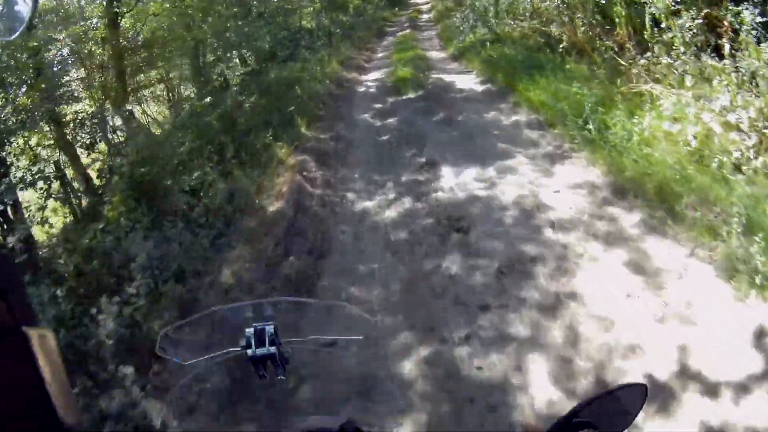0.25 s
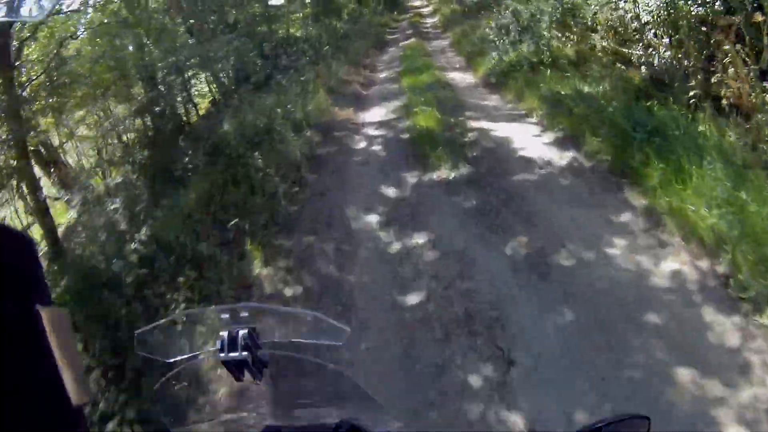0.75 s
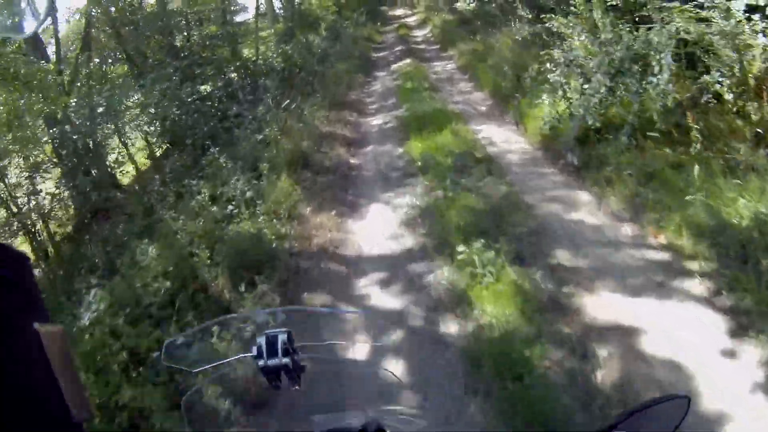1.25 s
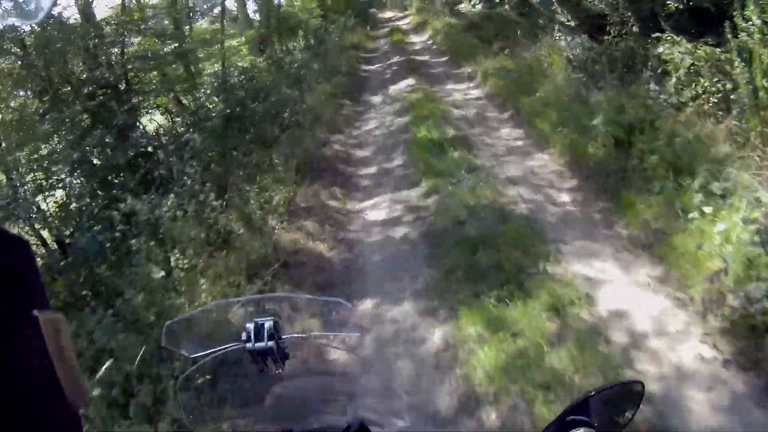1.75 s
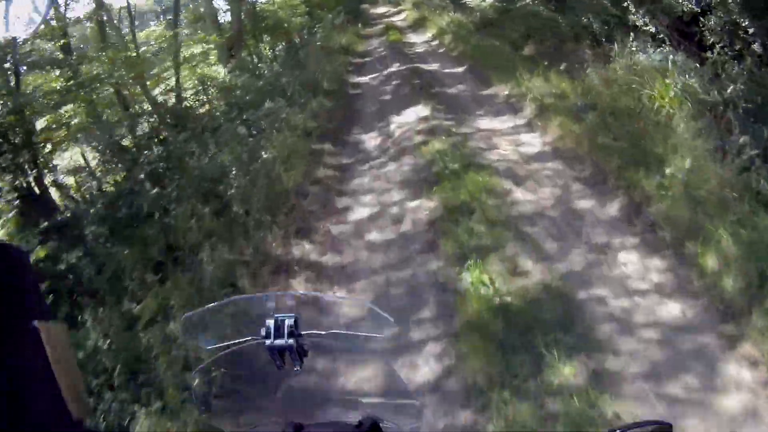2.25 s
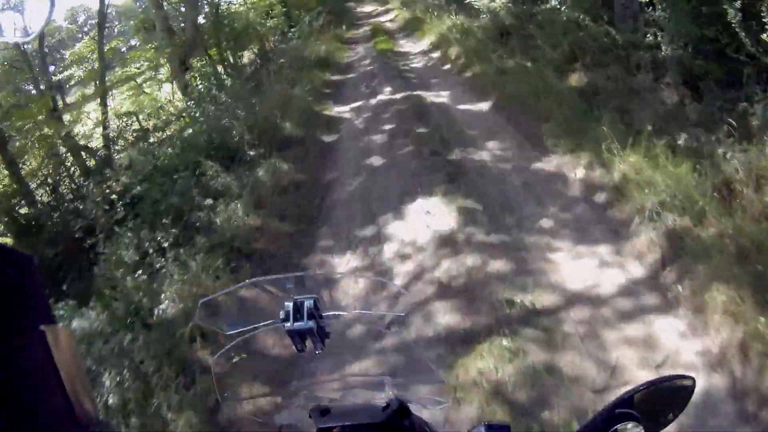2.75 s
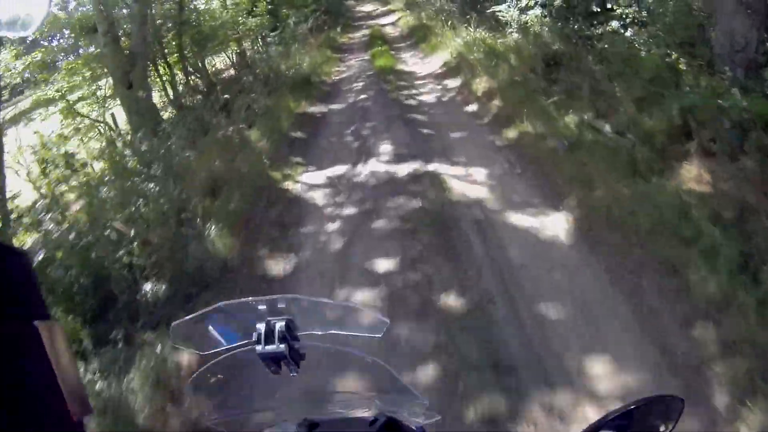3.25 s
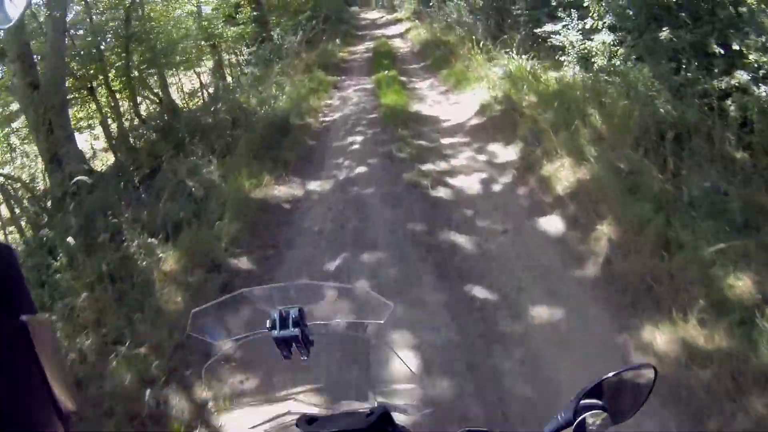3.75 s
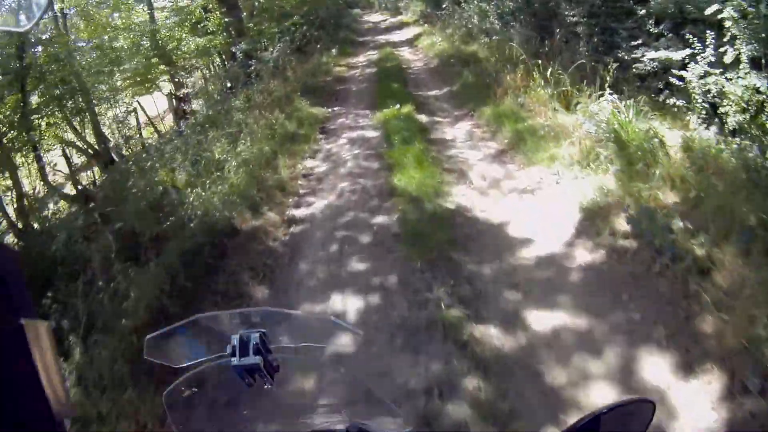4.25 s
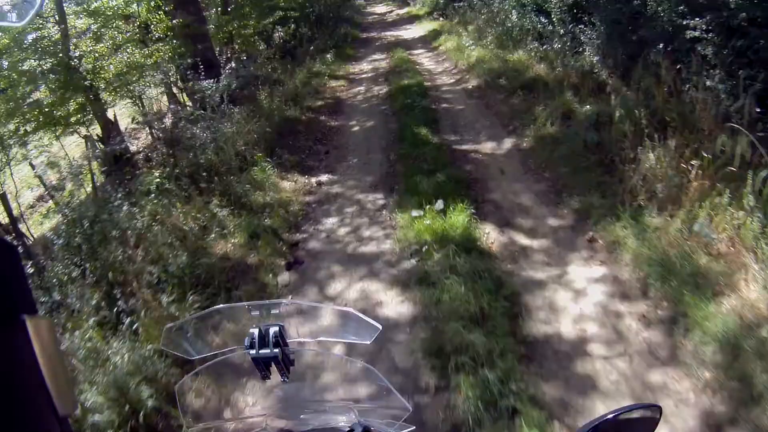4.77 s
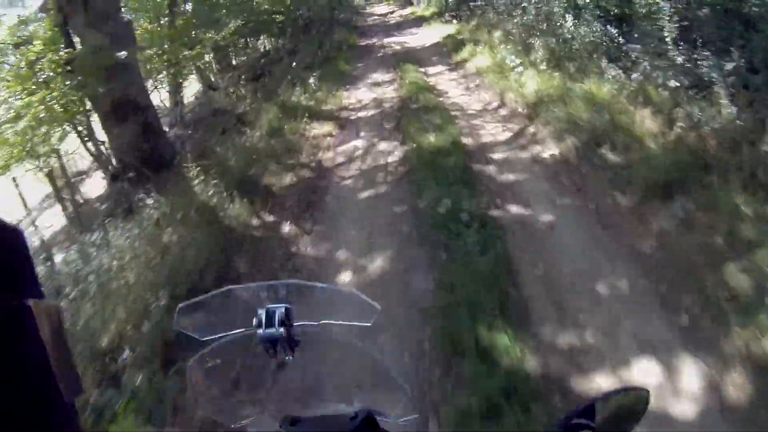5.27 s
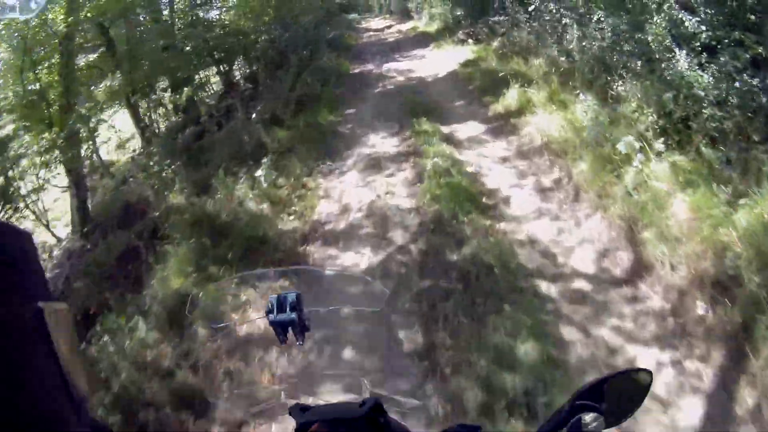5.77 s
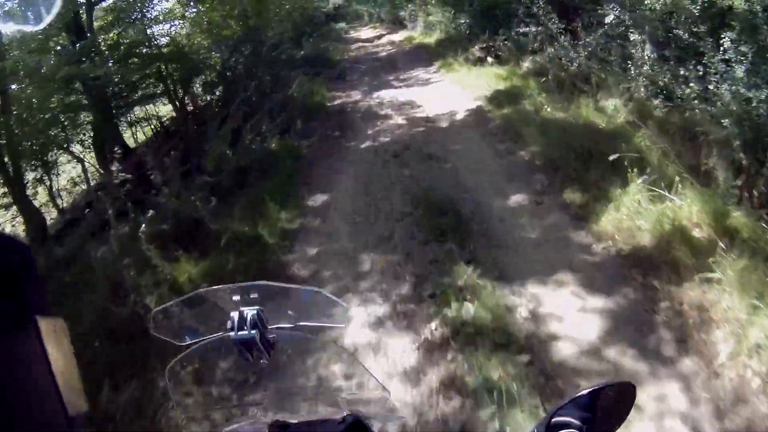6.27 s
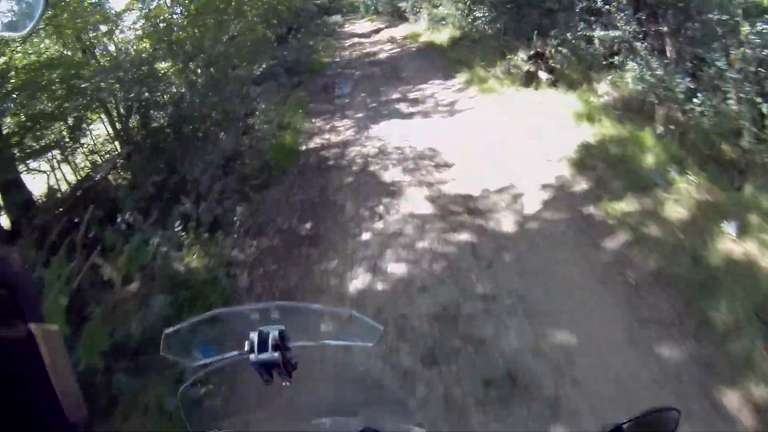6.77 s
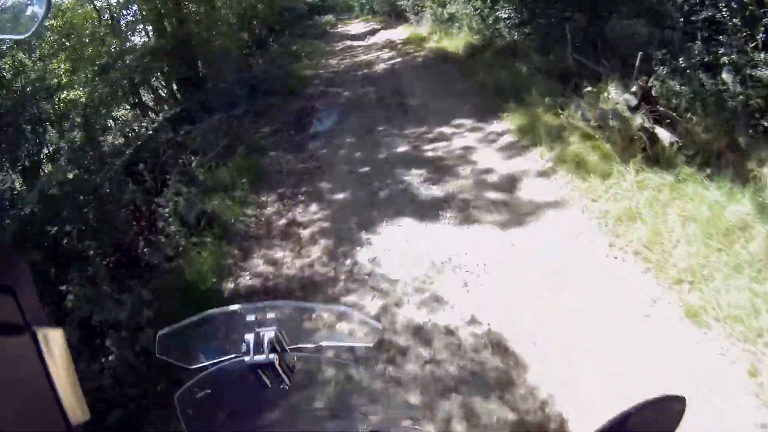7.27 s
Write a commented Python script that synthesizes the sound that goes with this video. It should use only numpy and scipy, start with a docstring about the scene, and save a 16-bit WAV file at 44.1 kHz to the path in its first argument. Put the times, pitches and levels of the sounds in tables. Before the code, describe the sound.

A motorcycle rides a bumpy dirt track, heard from a microphone inside a camera's plastic case. The case knocks and clacks very close in irregular bursts, over a low rumble, a muffled engine and faint tyre fizz. The knocking thins out midway, then returns with a loud clack and thud, and ends in a dense rattle with deep thuds and snaps of grit.

```python
"""A bumpy dirt track, heard from a moving motorcycle: one microphone, in a camera shut in a plastic case.
Right at the microphone the case knocks in its mount at every bump and rings; on rough ground it also
sways, chatters and clacks. The deepest bumps thud, and grit snaps on the shell.
From just outside, engine and tyres come muffled through the plastic, over a thin electronic whine."""
import sys
import numpy as np
from scipy import signal
from scipy.fft import rfft, irfft, next_fast_len
from scipy.io import wavfile
from scipy.ndimage import uniform_filter1d, map_coordinates

SR = 44100
rng = np.random.default_rng(int(sys.argv[2]) if len(sys.argv) > 2 else 0)


def int16_out(signal):
    """Quantize to a 16-bit WAV file."""
    q = np.round(np.clip(np.atleast_2d(signal).T, -1, 1) * 32767)
    wavfile.write(sys.argv[1], SR, q.astype(np.int16))


N = 331632
USUAL_EFFORT_DB, USUAL_SHAKE_DB = -56, -51  # ordinary riding; a growth is dB gained per dB above these


def amp(db):
    """Decibels to gain."""
    return 10 ** (np.asarray(db) / 20)


def unit(x):
    """Scale to rms 1."""
    return x / np.sqrt(np.mean(x ** 2) + 1e-20)


def along(points, hz):
    """Read (freq_hz, value) points on a log frequency axis."""
    freqs, values = np.transpose(points)
    return np.interp(np.log(hz + 1), np.log(freqs + 1), values)


def curve(points):
    """Join (time_s, value) points into one value per sample."""
    times, values = np.transpose(points)
    return np.interp(np.arange(N) / SR, times, values)


def wobble(rate):
    """A smooth random curve, rate knots a second."""
    knots = rng.standard_normal(int(N * rate / SR) + 4)
    return map_coordinates(knots, [np.arange(N) * rate / SR])


def filtered(x, response):
    """Pass x through a complex response of frequency."""
    size = next_fast_len(N + SR // 2)
    return irfft(rfft(x, size) * response(np.fft.rfftfreq(size, 1 / SR)), size)[:N]


def coloured(x, spectrum):
    """Equalise x by (freq_hz, gain_db) points."""
    return filtered(x, lambda hz: amp(along(spectrum, hz)))


def resonate(x, peaks):
    """Pass x through resonances of alternating sign, at rms 1."""
    def bank(hz):
        return sum((-1) ** k * amp(db) * 1j * hz * width / (centre ** 2 - hz ** 2 + 1j * hz * width)
                   for k, (centre, width, db) in enumerate(peaks))
    return unit(filtered(x, bank))


def grains(rate, spread_db):
    """Tiny random impacts of uneven size, about rate a second, at rms 1."""
    hits = (rng.random(N) < rate / SR) * rng.choice([-1, 1], N)
    return unit(hits * amp(spread_db * np.clip(rng.standard_normal(N), -2, 2)))


def add(track, start_s, sound):
    """Mix a sound into the track at start_s."""
    part = track[max(round(start_s * SR), 0):][:len(sound)]
    part += sound[:len(part)]


def running(shake_db, effort_db):
    """The track sways the mount, and fine vibration keeps the shell ringing over muffled road noise."""
    # sway of the mount, with two soft resonances: freq_hz, gain_db
    sway_spectrum = [(8, -22.5), (18, -2.5), (25, 2), (33, -2), (42, -18), (50, -5.5), (59, -1.5), (68, -9),
                     (85, -29), (110, -21), (250, -26.5), (340, -25), (520, -62), (1500, -96)]
    # resonances of the shell under steady vibration: centre_hz, width_hz, gain_db
    shell_modes = [(416, 68, -3), (880, 180, -16), (1128, 50, -9.5), (1449, 88, 2.5), (1567, 158, -0.5),
                   (1860, 145, -2), (2931, 71, -6.5), (3340, 58, -16.5), (3596, 62, -14),
                   (4000, 405, -17.5)]
    # road noise and tyre hiss from inside the case: freq_hz, gain_db
    road_spectrum = [(20, 15.5), (70, 11), (110, -6.5), (150, 4), (240, 0.5), (330, -8), (470, -6.5),
                     (600, -3), (900, -3), (1050, -4.5), (2300, -30.5), (4000, -23)]
    sway = unit(coloured(rng.standard_normal(N), sway_spectrum))
    # the springy mount keeps its swing even over a few cycles
    sway_power = np.abs(uniform_filter1d(sway ** 2, size=SR // 8))
    sway = unit(sway / np.sqrt(sway_power + 0.12))
    buzz = resonate(rng.standard_normal(N) + 0.45 * grains(rate=350, spread_db=6), shell_modes)
    road = unit(coloured(rng.standard_normal(N), road_spectrum))
    buzz_db = effort_db + 1.0 + 1.05 * wobble(25)
    road_db = effort_db - 1.5 + 0.47 * wobble(10)
    return amp(shake_db) * sway + amp(buzz_db) * buzz + amp(road_db) * road


def engine(effort_db, usual_db=-68.5, growth=0.47):
    """A low, uneven firing note that grows with effort; the case shuts out most overtones."""
    # the engine's firing rate: time_s, pitch_hz
    firing = [(0, 86), (1.3, 91.4), (2.6, 83), (3.5, 90.2), (4.3, 102), (4.9, 99), (5.4, 109.6), (6.5, 100),
              (7.52, 86)]
    pitch_hz = curve(firing) * (1 + 0.01606 * wobble(22))
    phase = 2 * np.pi * np.cumsum(pitch_hz) / SR
    note = np.sin(phase) + amp(-17.5) * np.sin(2 * phase) + amp(-12.0) * np.sin(3 * phase)
    level_db = usual_db + growth * (effort_db - USUAL_EFFORT_DB) + 2.2 * wobble(17)
    return amp(level_db) * unit(note)


def tyres(effort_db, usual_fizz_db=-63, growth=0.81):
    """Dirt fizzes under the tyres with effort; the finest spray comes in quick flurries."""
    # fizz of dirt under the tyres: freq_hz, gain_db
    fizz_spectrum = [(1500, -31), (2600, 8), (4200, 3.5), (4700, -3), (5300, 5), (6700, 4.5), (7300, -3),
                     (9000, 0), (11000, 1), (13000, -3.5), (14500, -2.5), (15500, 4)]
    # the finest dirt thrown at the bike: time_s, level_db
    spray_levels = [(0, -76), (.43, -65), (.6, -65.5), (1.15, -66), (1.4, -76.5), (3.8, -73), (4.7, -81),
                    (6.5, -80), (6.95, -64.5), (7.52, -72)]
    crunch = grains(rate=700, spread_db=4.5)
    dust = grains(rate=1500, spread_db=4.5)
    fizz = unit(coloured(rng.standard_normal(N) + 0.64 * crunch, fizz_spectrum))
    spray = unit(coloured(dust, [(2500, -18), (7000, -11), (12000, 1), (15500, -4.0)]))
    fizz_db = usual_fizz_db + growth * (effort_db - USUAL_EFFORT_DB)
    spray_db = curve(spray_levels) + 3.8 * wobble(35)
    return amp(fizz_db) * fizz + amp(spray_db) * spray


def whine():
    """The camera's electronics give thin, steady tones that waver slightly in phase."""
    # tones of the electronics: pitch_hz, level_db
    tones = [(6857.5, -78.5), (13545, -88), (13715, -74.5)]
    t = np.arange(N) / SR
    return sum(amp(db) * unit(np.sin(2 * np.pi * hz * t + 0.5 * wobble(8.7))) for hz, db in tones)


def case_ring(hollow_db, edge_db, middle_db=0, damping=0.23, contact_s=0.00055):
    """One blow rings the case; its place and hardness tilt the low (hollow), middle and high (edge) modes."""
    # modes of the plastic case: pitch_hz, level_db, t60_s
    case_modes = [(133.9,-17.5,0.29), (214,-10,0.05), (392.8,-1.5,0.11), (460.5,0.5,0.034),
                  (762,-1.5,0.012), (891,-10,0.041), (1215,-7,0.043), (1304,-9,0.036), (1530,0.5,0.026),
                  (1834,-2.5,0.029), (2064,3.5,0.023), (3370,-28,0.026), (4070,-38,0.033), (5760,-36,.012)]
    t = np.arange(SR // 4) / SR
    hz, db, t60 = np.transpose(case_modes)
    db = db + along([(500, hollow_db), (1150, middle_db), (1500, 0), (1600, 0), (2060, edge_db)], hz)
    # hard blows all sound alike; soft ones vary from blow to blow
    softness = np.clip(-edge_db, 0, 14)
    db = db + (0.8 + 0.05 * softness) * rng.standard_normal(len(hz))
    hz = hz * (1 + 0.0012 * softness * rng.standard_normal(len(hz)))
    # a soft blow stays in contact, which damps the low modes
    t60 = t60 * amp(-damping * softness * (hz < 1000))
    swing = amp(db) * (-1) ** np.arange(len(hz))  # neighbouring modes swing opposite ways
    modes = amp(-60 * t / t60[:, None]) * np.sin(2 * np.pi * hz[:, None] * t)
    return (swing @ modes) * (1 - np.exp(-t / contact_s))


def chatter(shake_db, usual_db=-63, growth=0.94):
    """Small dry knocks of the case come at random, louder as the shaking gets harder."""
    taps = np.zeros(N)
    for _ in range(3):
        ring = case_ring(hollow_db=-6, edge_db=-20, damping=0.7)
        taps += signal.fftconvolve(grains(rate=14, spread_db=3), ring / np.linalg.norm(ring))[:N]
    return amp(usual_db + growth * (shake_db - USUAL_SHAKE_DB)) * unit(taps)


def knocks(rebound_s=0.0042, crack_t60_s=0.011):
    """Each knock or clack rings the case; hard ones crack, and touch again just after."""
    # the mount hits its stop: start_s, relative_level_db, edge_db
    stop_hits = [(0.1022, -32, 0), (0.1795, -34.5, -1.5), (0.3313, -26.5, -2), (0.4874, -22, -0.5),
                 (0.5316, -38, -7), (0.5481, -30.5, -1), (.646, -30.5, -14), (0.7101, -24, 0.5),
                 (.7548, -29.5, -15), (0.7755, -33, -12), (0.789, -28.5, -14), (0.8031, -37, 0),
                 (0.82, -39.5, 1), (.854, -45, -6), (0.8987, -47, -7), (0.9637, -26.5, -10),
                 (1.0036, -24.5, 1), (1.1602, -26, -7), (1.1655, -25, 0.5), (1.2082, -42.5, -8),
                 (1.3778, -30.5, -1.5), (1.4328, -26, -11), (1.753, -32.5, 0), (1.7942, -32.5, -12),
                 (1.8775, -38, -6), (2.113, -31.5, -2), (2.3894, -29, 0), (2.5433, -33, -0.5),
                 (2.588, -39.5, 0.5), (3.4819, -56, -8), (3.7434, -35.5, -21), (3.8805, -25.5, -1),
                 (4.0338, -33.5, 0.5), (4.2229, -46, -4), (4.331, -29.5, -3.5), (5.1064, -29, -2.5),
                 (5.356, -27, -1), (5.4026, -39.5, -7), (5.545, -28.5, -2), (5.633, -29, -2),
                 (5.7118, -41, -8), (5.7626, -42, -13), (5.837, -27, -8.5), (5.916, -32, -5),
                 (6.0699, -33.5, -2.5), (6.374, -29, 1.5), (6.4426, -32.5, -2.5), (6.7064, -30.5, -30),
                 (6.817, -25, -2.5), (6.9251, -22.5, -2), (6.975, -35, -8), (7.017, -31.5, -10),
                 (7.033, -25, -10), (7.067, -28.5, -26), (7.1001, -22.5, -8.5), (7.1842, -32, -16),
                 (7.2183, -40, -3), (7.2621, -28.5, -13), (7.3027, -33.5, -14), (7.3849, -33, -4),
                 (7.4495, -28, -10)]
    # dry clacks of the shell itself, with weak low modes: start_s, relative_level_db
    clacks = [(.263, -38.5), (1.0656, -35), (5.8014, -16), (6.9516, -33), (7.083, -24), (7.1544, -27.5),
              (7.2434, -22.5), (7.3492, -26), (7.3989, -22)]
    even_db, hollow_slope = -30, 0.62  # the further below even_db a knock is, the hollower it rings
    clack_hollow_db, clack_edge_db, clack_middle_db = -9, -18, -9.5
    blows = [(s, db, hollow_slope * (even_db - db), edge_db, 0) for s, db, edge_db in stop_hits]
    blows += [(s, db, clack_hollow_db, clack_edge_db, clack_middle_db) for s, db in clacks]
    rings, cracks = np.zeros((2, N))
    t = np.arange(SR // 40) / SR
    for start_s, db, hollow_db, edge_db, middle_db in blows:
        add(rings, start_s, amp(db) * case_ring(hollow_db, edge_db, middle_db))
        for delay_s, touch_db in [(0.0008, 0), (rebound_s, -3)]:
            envelope = amp(db + edge_db + touch_db - 60 * t / crack_t60_s)
            add(cracks, start_s + delay_s, envelope * rng.standard_normal(len(t)))
    crack_spectrum = [(1500, -2.5), (2400, -9), (2850, -11), (3350, -7), (4700, -31), (5500, -8.5),
                      (6100, -38), (6700, -13.5), (7200, -37), (10000, -34), (11100, -26), (12500, -38)]
    return 0.59 * rings + coloured(cracks, crack_spectrum)


def jolts(bounce_hz=38, attack_s=0.0015, t60_s=0.19):
    """The deepest bumps heave the whole mount for a cycle or two, with a dull thud."""
    # deep bumps in the track: start_s, level_db
    bumps = [(0.791, -45), (5.802, -35), (7.108, -32), (7.172, -30)]
    heave, thud = np.zeros((2, N))
    t = np.arange(SR // 4) / SR
    for start_s, db in bumps:
        envelope = amp(db - 60 * t / t60_s) * (1 - np.exp(-t / attack_s))
        add(heave, start_s, envelope * np.sin(2 * np.pi * bounce_hz * t))
        add(thud, start_s, envelope * rng.standard_normal(len(t)))
    thud_spectrum = [(60, -10), (140, 3), (280, 4.5), (450, -3), (900, -23), (2000, -70)]
    return heave + coloured(thud, thud_spectrum)


def grit_snaps(body_hz=3000, body_width_hz=900, attack_s=0.00066, t60_s=0.0098):
    """Grit strikes the shell in bright, very short snaps, each with a brief ring of the plastic."""
    # grit hitting the shell: start_s, relative_snap_db, relative_body_db
    strikes = [(1.8762, -29.5, -46), (6.6593, -39, -29), (6.9394, -44, -44), (7.0968, -40, -38),
               (7.142, -40, -32), (7.353, -37, -28), (7.387, -41, -33), (7.427, -41, -35),
               (7.4714, -42, -41)]
    snaps, bodies = np.zeros((2, N))
    t = np.arange(SR // 40) / SR
    envelope = amp(-60 * t / t60_s) * (1 - np.exp(-t / attack_s))
    for start_s, snap_db, body_db in strikes:
        snap = envelope * rng.standard_normal(len(t))
        add(snaps, start_s, amp(snap_db) * snap)
        add(bodies, start_s, amp(body_db) * snap)
    snap_spectrum = [(1500, -20), (2400, -13), (2950, -15), (4500, -4),
                     (8500, -3), (11000, 5), (13800, -1), (15500, 2)]
    ring = filtered(bodies, lambda hz: 1 / (1 + 2j * (hz - body_hz) / body_width_hz) ** 2)
    return coloured(snaps, snap_spectrum) + 2 * ring


def scene():
    """Effort and rough ground drive the ride; it all reaches the one microphone inside the case."""
    # how hard the bike runs, as its running noise: time_s, level_db
    effort = [(0, -56), (.2, -59.5), (.45, -53.5), (.6, -58), (1.15, -55), (1.7, -59), (2.92, -61),
              (3.18, -55.5), (3.4, -61), (3.6, -56), (4.2, -56.5), (4.49, -53.5), (4.64, -58.5),
              (5.62, -53), (5.85, -54.5), (6.07, -51.5), (6.6, -55), (7.0, -52.5), (7.52, -52)]
    # roughness of the track, as the shaking of the mount: time_s, level_db
    roughness = [(0, -53.5), (.62, -51), (.85, -45), (1.35, -54.5), (1.85, -54), (2.1, -56), (2.9, -59),
                 (3.17, -49), (3.32, -62.5), (3.62, -51.5), (4.1, -56.5), (5.75, -57), (5.95, -48),
                 (6.5, -61.5), (6.8, -45.5), (7.17, -44), (7.37, -49), (7.52, -46.5)]
    ruts = wobble(rate=9)  # single ruts swell the shaking and the running noise at random
    shake_db = curve(roughness) + 2 * ruts
    effort_db = curve(effort) + 1.31 * ruts
    rattle = knocks() + jolts() + grit_snaps() + chatter(shake_db)
    ride = running(shake_db, effort_db) + engine(effort_db) + tyres(effort_db)
    return (rattle + ride + whine())[None]


def record(dry):
    """The camera takes one channel and keeps nothing above its band limit."""
    top_hz = 15850
    return filtered(dry[0], lambda hz: hz < top_hz)[None]


dry = scene()
out = record(dry)
int16_out(out)
```